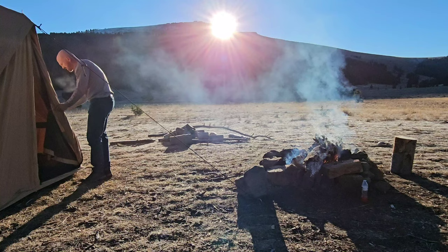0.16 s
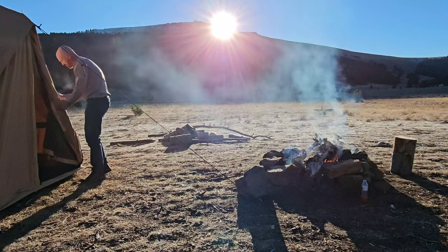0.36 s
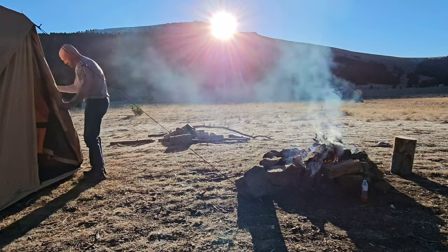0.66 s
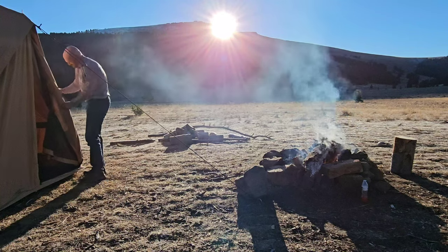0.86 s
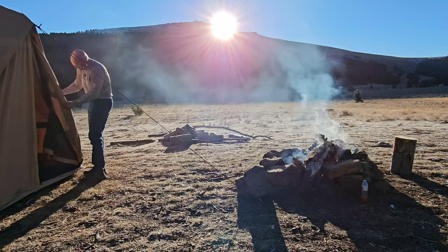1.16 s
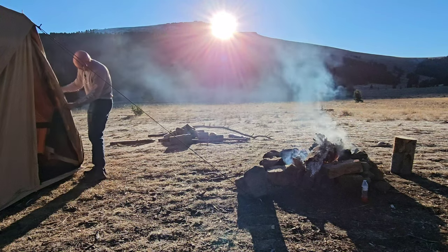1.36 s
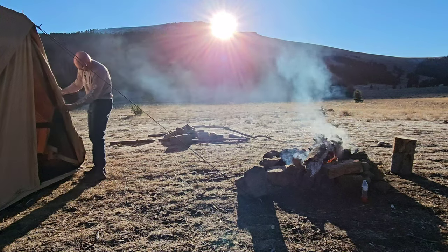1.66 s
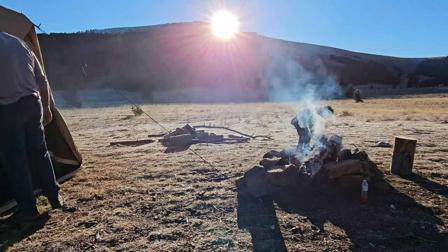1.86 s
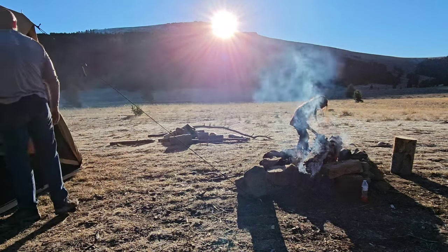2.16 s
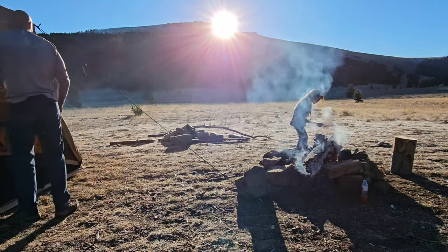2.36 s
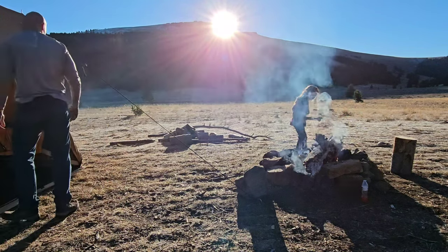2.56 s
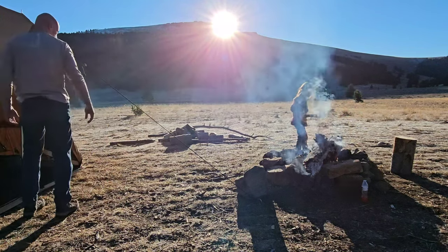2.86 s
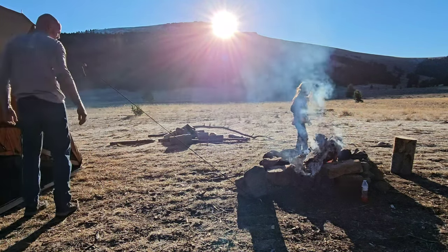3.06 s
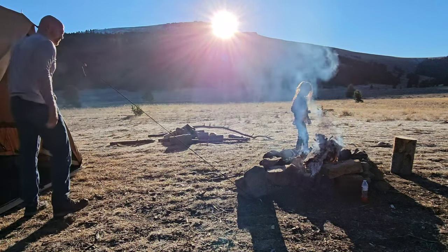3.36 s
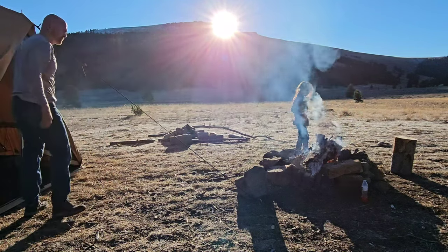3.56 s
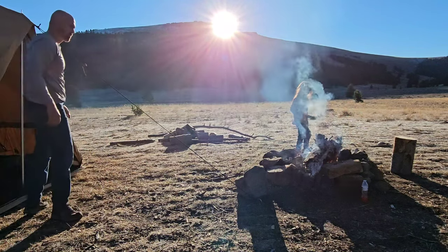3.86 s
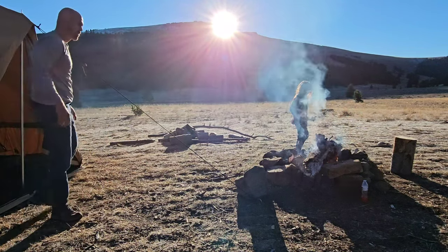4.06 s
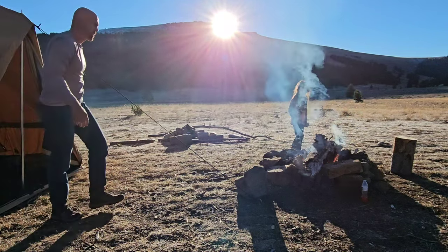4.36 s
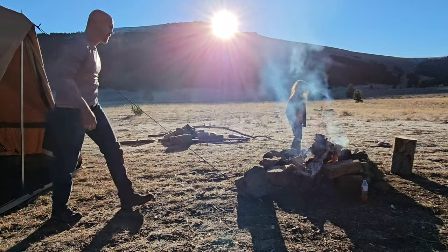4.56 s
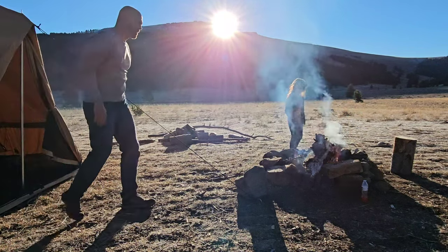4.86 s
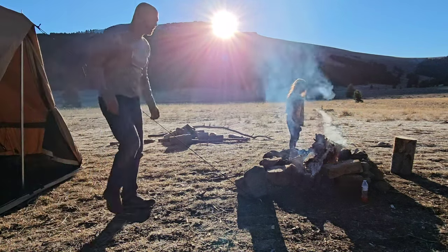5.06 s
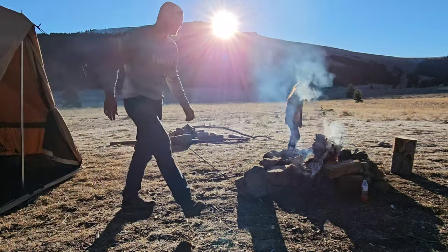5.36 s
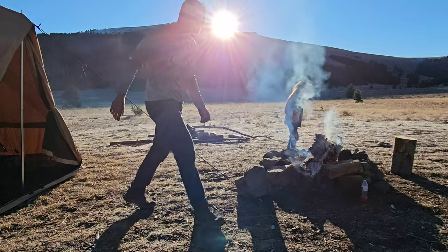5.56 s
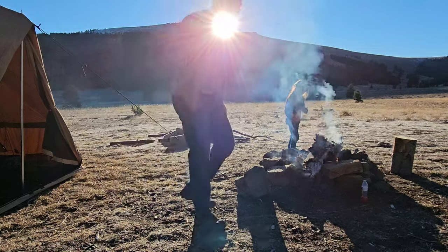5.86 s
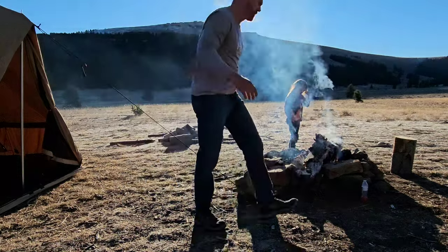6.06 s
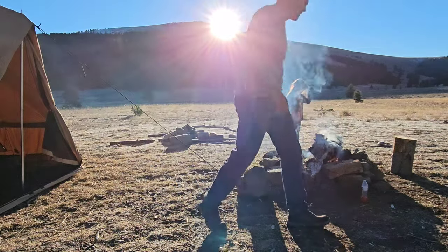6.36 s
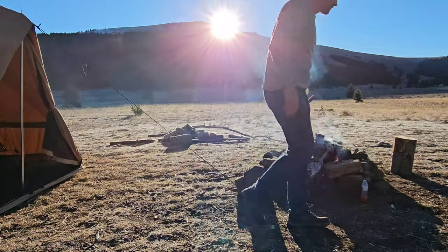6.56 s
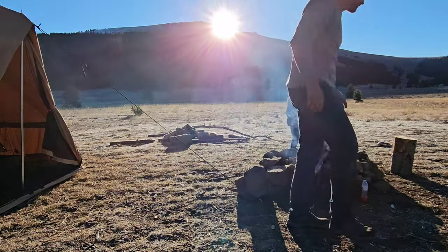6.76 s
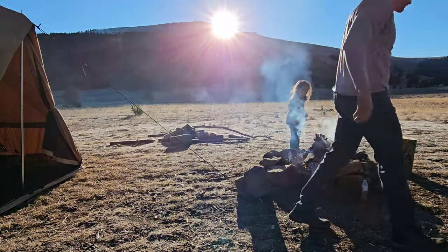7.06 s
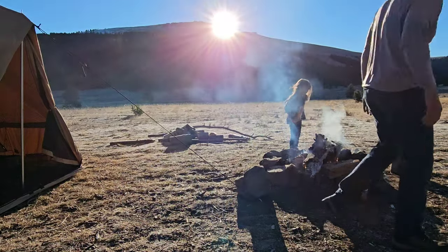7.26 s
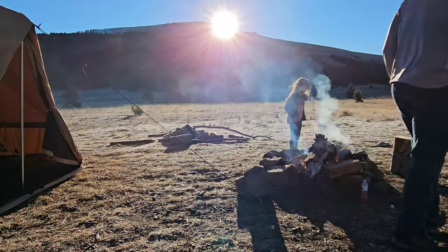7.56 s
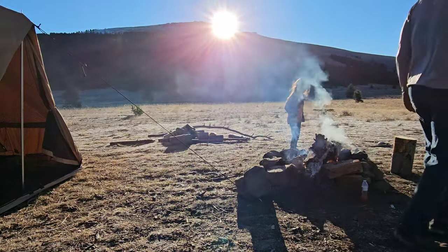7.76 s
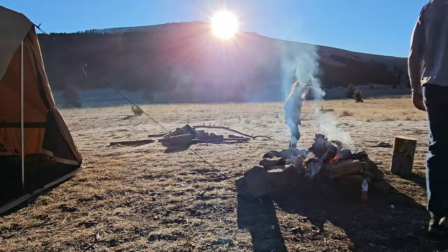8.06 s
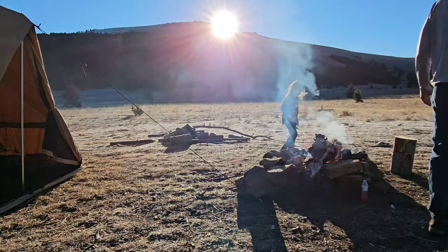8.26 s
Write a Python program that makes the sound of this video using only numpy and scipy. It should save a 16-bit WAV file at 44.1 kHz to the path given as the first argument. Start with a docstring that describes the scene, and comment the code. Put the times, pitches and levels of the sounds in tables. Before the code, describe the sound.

Outdoors, a few steps from the microphone, a fire in a stone ring crackles steadily, its bright, dry snaps standing out above gently rumbling flames. After a pair of loud cracks near the start, the flames' rush settles lower. Faint thumps of logs and boots and brief rubs of tent canvas mix in. Toward the end a log falls, the coals give a short fizz, and the popping carries on.

```python
"""A wood fire in a ring of stones on open ground, a few steps from a two-port microphone.
Flames rumble, roar and hiss, embers tick, and sap pockets pop, each pop slapping back off the stones.
Two loud cracks come near 1.5 s; the roar and hiss, louder at first, step down near 1.8 s. Logs and
boots thud and canvas scuffs here and there, and a faint whistle passes at 5.5 s. At 6.8 s a log drops
and the coals fizz; at 7.1 s comes a soft, brief crunch of hiss, like a step on dry grass."""
import sys
import numpy as np
from scipy import signal
from scipy.fft import rfft, irfft, next_fast_len
from scipy.io import wavfile
from scipy.ndimage import uniform_filter1d, map_coordinates

SR = 44100
rng = np.random.default_rng(int(sys.argv[2]) if len(sys.argv) > 2 else 0)


def int16_out(signal):
    """Quantize to a 16-bit WAV file."""
    q = np.round(np.clip(np.atleast_2d(signal).T, -1, 1) * 32767)
    wavfile.write(sys.argv[1], SR, q.astype(np.int16))


N = 371322

# Bursting sap pockets. Each row: start in seconds, level in dB, pitch in Hz, then the wooden knock
# and the hissing tail, both in dB relative to the crack.
SAP_POPS = [(0.1746, -5, 7610, -34, -29.5), (0.1844, -21.5, 5430, -20, -18),
            (0.2491, -32.5, 9240.0, -27, -22), (0.3773, -40.5, 11300, -14, -16),
            (0.4316, -40.5, 7220.0, -40.0, -12.5), (0.4791, -41.5, 7560, -40.0, -20),
            (0.6255, -26, 7870, -27, -20.5), (0.6386, -27, 7300.0, -49, -28),
            (0.7045, -46, 13100, -40, -21), (0.7319, -41.5, 2470, -2.5, -23), (0.7702, -35, 5560, -46, -17),
            (0.8616, -46, 8150, -37, -11.0), (0.9314, -33, 9630.0, -23, -10.5),
            (0.9977, -41, 8200, -40.0, -17), (1.0517, -33, 8900, -8.5, -16),
            (1.1052, -32.5, 2640, -14, -17), (1.124, -35, 7900, -40.0, -18),
            (1.1409, -38.5, 6060.0, -28, -22), (1.189, -24.5, 9640, -54, -24.0),
            (1.365, -42.5, 9300, -25.5, -18), (1.48, 1, 3155, -23.5, -29), (1.4893, -8.5, 5820, -28.5, -20),
            (1.563, 0.5, 7440, -16.5, -24), (1.5732, -20, 7000, -38.5, -20),
            (1.7953, -31.0, 13500.0, -42, -20.0), (2.029, -32, 7470, -45, -27.5),
            (2.1066, -47.5, 5260, 2, -17), (2.2032, -46, 5000, -35, -20), (2.2124, -24.5, 9450, -46.5, -26),
            (2.2522, -23.5, 1850, -13, -16), (2.3184, -33.5, 9130, -46, -23),
            (2.4014, -37.5, 7400, -19, -12), (2.4441, -34.5, 6000, -28, -26),
            (2.4849, -36.5, 7700, -48, -23), (2.5555, -36, 7700, -33, -19),
            (2.6629, -28, 2110, -7.5, -20.5), (2.7011, -28.5, 7500, -6, -14.5),
            (2.7307, -31.5, 4270, -29, -33), (2.8149, -39.5, 9500, -32, -15),
            (2.8899, -39, 3800, -17, -21.0), (2.9525, -42.5, 9770.0, -32, -20.5),
            (3.0181, -39, 7730.0, -22, -18), (3.1807, -38.5, 7900, -35, -20.5),
            (3.2576, -43.5, 7800, -28, -20), (3.3202, -31.5, 4690.0, -12.5, -23),
            (3.3321, -34.5, 8800, -33, -27), (3.3919, -35, 5970, -15, -25),
            (3.4815, -15, 1950, -8.5, -27.5), (3.5346, -31.5, 13600.0, -46, -19.5),
            (3.7168, -25, 7200, -28, -35), (3.7585, -33.5, 3860, 3, -25), (3.8629, -37, 5400, -31, -19),
            (3.9319, -30.5, 9670.0, -42, -22.5), (3.9596, -39.5, 9390.0, -15, -29),
            (3.99, -41, 5380, -32, -11.5), (4.1267, -29, 5840, -5, -15.0), (4.2096, -37.5, 7140, -9, -25.0),
            (4.438, -22, 7560, -21.5, -27), (4.4812, -30.5, 5300, -21, -20.5),
            (4.564, -26, 5600, -27, -16.5), (4.5756, -16.0, 3030, -45, -27.5), (4.617, -29, 1720, 1.5, -27),
            (4.8663, -35, 9600, -18.5, -16.5), (4.8937, -13.5, 5900, -17.5, -18),
            (4.9293, -19, 8060, -14.5, -23.0), (5.0037, -34, 11570, -16.5, -19),
            (5.0221, -35.0, 7440, -39, -22), (5.2605, -25.5, 9450.0, -7, -21),
            (5.3504, -30.5, 4940, -31, -29), (5.3681, -38.5, 8200, -20, -16), (5.4246, -43, 6000, -7, -28),
            (5.5128, -48.5, 7100, -50, -5), (5.5754, -47.5, 1700, -24, -16.5),
            (5.8096, -32.5, 7560, -44.5, -29), (5.8282, -16.0, 7600, -19.0, -28),
            (5.8823, -38, 14300, -24, -21), (5.8969, -21.5, 5600, -26.5, -26),
            (5.9343, -33.5, 7260, -38, -30), (6.0446, -44, 7850, -41, -24),
            (6.1097, -39.5, 9820.0, -36, -19), (6.2529, -25, 15020, -21.5, -24.5),
            (6.4301, -30.5, 7340, -42, -23), (6.4552, -36.5, 7350, -20.5, -16),
            (6.468, -39, 8930, -33, -12), (6.6122, -32, 1630, -7, -17.5), (6.6651, -22, 6070, -6, -13),
            (6.7512, -29, 7400.0, -44, -18), (6.7592, -33.5, 4970.0, -11.5, -11.5),
            (6.7819, -9.5, 1480, -16, -20), (6.9288, -33.5, 9800, -44, -25),
            (6.9455, -32.5, 10300.0, -17, -24), (7.035, -52, 2970, -25, -26.5),
            (7.0611, -39, 9220.0, -10, -22.0), (7.0794, -33.0, 5460, -7.0, -19.5),
            (7.2079, -29.5, 1380, -9, -16), (7.2261, -28, 10000, -7, -14.5),
            (7.3131, -21.0, 7080, -37, -24.5), (7.4912, -27, 12600, -15.5, -19.5),
            (7.6092, -15, 7350, -18, -32), (7.639, -35.0, 9100, -42, -28),
            (7.7507, -36.5, 7900, -50, -17.5), (7.8166, -35.5, 7900, -33, -19.5),
            (7.8517, -27, 7600, -26, -27.5), (8.0014, -13.5, 5170, -5, -28.5),
            (8.0395, -41, 7150, -35, -20.5), (8.0537, -15.5, 7000.0, -20.5, -25),
            (8.0845, -41, 1960, 0, -16.5), (8.162, -27.0, 6670, -23, -20), (8.189, -38, 4360, -27, -22),
            (8.308, -41.5, 7800, -49, -16.0), (8.3489, -38.5, 1460, 7.0, -14.5),
            (8.386, -43, 2400, -11, -24)]
# Slapback off the stones. Each row: delay in seconds, left level in dB, right level in dB.
STONE_ECHOES = [(.005, -23, -16.5), (.0097, -25, -23)]
# Logs and boots. Each row: start in seconds, level in dB, pitch in Hz, time to fall 60 dB in seconds,
# clatter in dB relative to the thump.
LOG_AND_BOOT_THUDS = [(1.276, -35, 194, 0.026, -11.5), (1.564, -36.5, 117, 0.11, -14),
                      (2.25, -34, 112, 0.016, -1.5), (2.263, -31.5, 128, 0.011, -14),
                      (2.658, -32.5, 213, 0.021, -4.5), (2.696, -33.5, 164, 0.014, -8),
                      (3.476, -39, 240, 0.047, -3.5), (3.848, -33.5, 186, 0.014, -13.5),
                      (4.122, -32, 214, .01, -4.5), (4.892, -32.5, 202, 0.024, -7.5),
                      (5.656, -35.5, 170, 0.028, -15), (6.661, -31, 211, 0.012, -5.5),
                      (6.781, -26, 239, 0.065, -30), (6.797, -4, 196, .011, -9.5),
                      (6.82, -29, 249, .04, -11), (6.88, -31, 186, 0.013, -6.5),
                      (7.077, -38, 103, 0.056, -4), (7.141, -33.5, 149, 0.019, -9),
                      (7.517, -27, 102, .01, -16.5), (7.716, -36, 100, 0.015, -32),
                      (8.349, -23.5, 242.5, 0.029, -11), (8.358, -22.5, 106, 0.021, -33)]
# Canvas and soles rubbing. Each row: start in seconds, peak level in dB, pitch in Hz.
CANVAS_AND_BOOT_SCUFFS = [(0.018, -44.5, 643), (0.451, -53, 1300), (0.49, -50, 680), (0.541, -44, 590),
                          (0.562, -44, 1130), (0.785, -49, 396), (2.267, -36.5, 510), (2.411, -48.5, 589),
                          (2.979, -48, 450), (4.683, -52.5, 474), (6.287, -48, 533), (6.415, -49.5, 530),
                          (7.095, -43, 446), (7.132, -59, 1490), (7.159, -44, 460), (7.514, -43.5, 1740),
                          (7.534, -46.5, 470), (7.721, -45, 450), (8.258, -50, 556)]
# The rise and fall of the blaze. Each row: time in seconds, rumble level in dB.
RUMBLE_LEVELS = [(0, -46), (.3, -46), (1.4, -46), (1.95, -51.5), (2.3, -50.5), (2.8, -45), (3.5, -48),
                 (4.4, -46.5), (4.75, -51.5), (5.4, -47), (6.1, -47.5), (6.5, -49), (6.85, -45.5),
                 (7.15, -45), (7.5, -52.5), (8.25, -47.5), (8.42, -44)]
# Coals fizzing under a dropped log, then a soft crunch like a step on dry grass.
# Each row: start in seconds, level in dB, time to fall 60 dB in seconds.
HISS_BURSTS = [(6.784, -35.5, .3), (7.13, -56.5, 0.34)]
# EQ curves for the crack and the three flame layers. Each row: frequency in Hz, gain in dB.
CRACK_EQ = [(710, -18), (1200, -17.5), (2320, -8), (3630, -5), (4940, -5), (5760, -5.5), (9640, -11),
            (10600, -12), (14900, -12), (16500, -36.5)]
RUMBLE_EQ = [(12, -49), (20, -14), (43, 1.5), (86, 4), (145, -5.5), (252, -11.5), (315, -27.5), (400, -28),
             (520, -58.5), (880, -120)]
ROAR_EQ = [(150, -27), (250, 0.5), (361, -12.5), (572, -6.5), (1090, -18), (1260, -13.5), (2500, -29),
           (3250, -45.5), (5500, -120)]
HISS_EQ = [(1180, -40), (2000, -1.5), (3740, -2), (6820, -6.5), (7390, -0.5), (9540, -6), (10900, -10.5),
           (14800, -8), (15800, -19.5), (16500, -37.5)]
# Stereo image of the flames. Each row: frequency in Hz, left-right likeness from 0 (wide) to 1 (mono).
STEREO_LIKENESS = [(60, 1), (290, 0.88), (640, 0), (1400, 0), (3000, 0)]

LOW_DB, LOW_PER_KNOCK, LOW_PER_OCTAVE_DB = -14, 0.17, 10  # woodier, deeper pops get more low end
ECHO_ABOVE_HZ = 3000  # the stones are too small to return the bass
TICK_FLOOR_DB, TICK_SPREAD_DB, TICK_CEILING_DB = -58, 4.5, -42
ROAR_DB, HISS_DB = -68.5, -72  # after the step down
LOUDER_UNTIL_S, STEP_DOWN_S, EXTRA_ROAR_DB, EXTRA_HISS_DB = 1.653, 0.167, 5.7, 8.6
SCUFF_T60_S = 0.083
WHISTLE_S, WHISTLE_HZ, WHISTLE_DB = 5.46, 856, -63  # at the top of its swell
LEFT_LAG_SAMPLES = 5  # the sound reaches the left port later
NOTCH_HZ, NOTCH_WIDTH_HZ, NOTCH_DEPTH, TOP_HZ = 10680, 730, .8, 16700


def pop(db, pitch_hz, knock_db, low_db, tail_db, length):
    """A burst of steam: a sharp crack, its slapback, a spitting tail and a knock of the wood."""
    t = np.arange(length) / SR
    since_burst = t - .0012  # the fibres tear for a millisecond first
    noise = unit(filtered(rng.standard_normal((3, length)), lambda hz: pop_colour(hz, pitch_hz, low_db)))
    snap = crack(noise, since_burst, pitch_hz)
    sound = snap + stone_echoes(snap)
    tail_fade = decay(t, 0.057) + amp(-7.5) * decay(t, 0.21)
    sound += amp(tail_db) * steam_tail(noise[1:], since_burst, pitch_hz) * tail_fade
    sound += amp(knock_db) * wood_knock(t)
    return amp(db) * sound * amp([[-.4], [.4]])  # a touch to the right


def pop_colour(hz, pitch_hz, low_db):
    """Two shelves: small pockets carry little below 3.5 kHz, deep pops little above 10 kHz."""
    low_gain = np.minimum(amp(low_db + 12), 3)  # flat at low_db = -12
    high_gain = amp(3.9 * np.log2(np.minimum(pitch_hz / 5000, 1.8)))
    low_shelf = low_gain + (1 - low_gain) / (1 + (3500 / (hz + 1)) ** 6)
    high_shelf = high_gain + (1 - high_gain) / (1 + (hz / 10000) ** 8)
    return amp(along(CRACK_EQ, hz)) * low_shelf * high_shelf


def crack(noise, since_burst, pitch_hz):
    """The fibres tear, the pocket bursts and its cavity rings for a few cycles."""
    spike = np.exp(np.where(since_burst < 0, since_burst / .00035, -since_burst / .0004))
    burst = (noise[0] + .4 * noise[1:]) * spike
    air = lambda hz: 0.54 / (1 + (10000 / (hz + 1)) ** 4)
    burst = filtered(burst, lambda hz: 1 + 2.5 * resonance(hz, pitch_hz, 0.12 * pitch_hz) + air(hz))
    cycles = np.maximum(since_burst, 0) * pitch_hz
    ring = np.sin(2 * np.pi * cycles) * np.exp(-cycles / 2.5)
    return unit_peak(unit_peak(burst) + .4 * ring)


def stone_echoes(snap):
    """The stone faces throw back the top end of a crack, a little differently each time."""
    bright = filtered(snap, lambda hz: 1j * hz / (ECHO_ABOVE_HZ + 1j * hz))
    echoes = np.zeros_like(snap)
    for delay_s, *sides_db in STONE_ECHOES:
        gains = amp(np.array(sides_db)[:, None] + rng.normal(0, 1.7))
        echoes += gains * np.roll(bright, round(delay_s * SR), axis=1)
    return echoes


def steam_tail(noise, since_burst, pitch_hz):
    """The split keeps spitting: about 110 tiny spikes a second ride on a wide hiss."""
    length = len(since_burst)
    spits = (rng.random(length) < 110 / SR) * rng.uniform(0, 3, length)
    spikes = signal.lfilter([1], [1, -np.exp(-1 / (.0007 * SR))], spits)
    steam = filtered(noise, lambda hz: 1 + resonance(hz, pitch_hz, 0.55 * pitch_hz))
    return steam * (.55 + spikes) * np.clip(since_burst / 0.00076, 0, 1)


def wood_knock(t):
    """The burst kicks the log, which answers with two dull, damped modes."""
    age = np.maximum(t - .0008, 0) / 0.00042  # in pulse widths
    grit = 0.28 * rng.standard_normal(len(t)) * decay(t, 0.037)
    push = (age > 0) * ((1 - age) * np.exp(-age) + grit)
    wood = lambda hz: resonance(hz, 580, 1900) ** 2 + 0.51 * resonance(hz, 190, 150)
    return unit_peak(filtered(push, wood))


def sap_pops():
    """The foreground crackle: sap pockets burst one by one, the loud ones with room for a longer tail."""
    track = np.zeros((2, N + SR))
    for start, db, hz, knock_db, tail_db in SAP_POPS:
        octaves_down = max(np.log2(5000 / hz), 0)
        low_db = LOW_DB + LOW_PER_KNOCK * knock_db + LOW_PER_OCTAVE_DB * octaves_down
        length = SR // 3 if db > -24 else SR // 8
        add(track, start, pop(db, hz, knock_db, low_db, tail_db, length))
    return track[:, :N]


def ember_ticks():
    """Embers fill the gaps with tiny pops, denser at first."""
    track = np.zeros((2, N + SR))
    palette = [pop(0, 4000 + 8000 * pitch, knock_db=-30 + 12 * body, low_db=-24 + 12 * body,
                   tail_db=-22, length=2048) for pitch, body in rng.random((40, 2))]
    for when, rarity, pick, early in rng.random((440, 4)):
        start = when * (LOUDER_UNTIL_S if early < .15 else N / SR)
        db = min(TICK_FLOOR_DB - TICK_SPREAD_DB * np.log(rarity), TICK_CEILING_DB)
        add(track, start, amp(db) * palette[int(pick * len(palette))])
    return track[:, :N]


def thuds():
    """Logs and boots land: a bass thump that hardly rings, with a clatter on top."""
    track, t = np.zeros((2, N + SR)), np.arange(SR // 5) / SR
    clatter_colour = lambda f: resonance(f, 403, 470) ** 2 - 0.15 * resonance(f, 1326, 370) ** 2
    for start, db, hz, t60, clatter_db in LOG_AND_BOOT_THUDS:
        thump = np.sin(2 * np.pi * hz * t) * decay(t, t60) * (1 - np.exp(-t / 0.0031)) ** 2
        grit = rng.standard_normal(len(t)) + 0.55 * rng.standard_normal((2, len(t)))
        grit *= (decay(t, 0.081) + amp(-18) * decay(t, 0.21)) * np.minimum(t / 0.00233, 1) ** 2
        clatter = filtered(grit, clatter_colour)
        add(track, start, amp(db) * (unit_peak(thump) + amp(clatter_db) * unit_peak(clatter)))
    return track[:, :N]


def scuffs():
    """Canvas and soles rub for a moment: soft noise around one pitch."""
    track, t = np.zeros((2, N + SR)), np.arange(SR // 5) / SR
    envelope = decay(t, SCUFF_T60_S) * np.minimum(t / 0.0011, 1)
    for start, db, hz in CANVAS_AND_BOOT_SCUFFS:
        friction = rng.standard_normal(len(t)) + 1.14 * rng.standard_normal((2, len(t)))
        rub = filtered(friction * envelope, lambda f: resonance(f, hz, 0.79 * hz) ** 2)
        add(track, start, amp(db) * unit_peak(rub))
    return track[:, :N]


def flames():
    """The bed: fluttering flames rumble in lumps under a roar and a hiss with two short bursts."""
    t = np.arange(N) / SR
    louder = np.clip((LOUDER_UNTIL_S - t) / STEP_DOWN_S + 1, 0, 1)
    flutter = wobble(8.7)
    lumps = amp(0.332 * flutter + 2.8 * wobble(13))
    rumble_db = np.interp(t, *np.transpose(RUMBLE_LEVELS))
    rumble = amp(rumble_db) * unit(lumps * flame_noise(RUMBLE_EQ, patchy_db=0.68))
    roar_db = ROAR_DB + EXTRA_ROAR_DB * louder + 0.37 * flutter + 2.4 * wobble(30)
    roar = amp(roar_db) * flame_noise(ROAR_EQ, patchy_db=2.0)
    bursts = sum((t > start) * amp(db) * decay(np.maximum(t - start, 0), t60)
                 for start, db, t60 in HISS_BURSTS)
    hiss_db = HISS_DB + EXTRA_HISS_DB * louder + 1.5 * wobble(3.2) + 2.0 * wobble(90)
    hiss = (amp(hiss_db) + bursts) * flame_noise(HISS_EQ, patchy_db=.4)
    return rumble + roar + hiss


def flame_noise(eq, patchy_db):
    """A rush at rms 1, mottled in time and pitch, centred in the bass and wide above."""
    cells = signal.stft(rng.standard_normal((2, N)), nperseg=512)[2]
    patches = uniform_filter1d(uniform_filter1d(rng.standard_normal(cells.shape[1:]), 8, 0), 6, 1)
    mottled = signal.istft(cells * amp(patchy_db * unit(patches)), nperseg=512)[1][:, :N]
    spread = lambda hz: np.arccos(np.clip(along(STEREO_LIKENESS, hz), -1, 1)) / 2
    mid_side_eq = lambda hz: amp(along(eq, hz)) * [np.cos(spread(hz)), np.sin(spread(hz))]
    mid, side = filtered(mottled, mid_side_eq)
    return unit(np.array([mid + side, mid - side]))


def whistle():
    """A faint, wavering tone that swells and fades, perhaps steam leaving a crack."""
    under_db = 10 * ((np.arange(N) / SR - WHISTLE_S) / .11) ** 2  # 10 dB down 0.11 s either side
    hz = WHISTLE_HZ - 1.1 * np.minimum(under_db, 20) + 4 * wobble(25)  # quieter is flatter
    db = WHISTLE_DB - under_db + 1.5 * wobble(30)
    phase = 2 * np.pi * np.cumsum(hz) / SR
    octave = amp(2 * db + 48.5) * np.sin(2 * phase)  # grows with the square of the strength
    return np.sqrt(2) * (amp(db) * np.sin(phase) + octave)


def amp(db):
    """Gain of a level in dB."""
    return 10 ** (np.asarray(db) / 20)


def decay(t, t60):
    """A fade that falls 60 dB every t60 seconds."""
    return amp(-60 * t / t60)


def unit(x):
    """x at rms 1."""
    return x / np.sqrt(np.mean(x ** 2) + 1e-20)


def unit_peak(x):
    """x at peak 1."""
    return x / abs(x).max()


def along(points, hz):
    """Reads a curve of (Hz, value) points on a log frequency axis."""
    f, v = np.transpose(points)
    return np.interp(np.log(hz + 1), np.log(f + 1), v)


def wobble(rate):
    """A smooth random curve, rate knots a second."""
    return map_coordinates(rng.standard_normal(int(N * rate / SR) + 4), [np.arange(N) * rate / SR])


def filtered(x, response):
    """x through a filter given as a complex response of frequency."""
    n = x.shape[-1]
    padded = next_fast_len(n + 1024)
    return irfft(rfft(x, padded) * response(np.fft.rfftfreq(padded, 1 / SR)), padded)[..., :n]


def resonance(hz, centre_hz, width_hz):
    """Response of one damped mode, 1 at its centre."""
    return 1j * hz * width_hz / (centre_hz ** 2 - hz ** 2 + 1j * hz * width_hz)


def add(track, start_s, sound):
    """Mixes in a stereo sound, the left side a little late."""
    at = round(start_s * SR)
    track[0, at + LEFT_LAG_SAMPLES:][:sound.shape[1]] += sound[0]
    track[1, at:][:sound.shape[1]] += sound[1]


def scene():
    """The fire and the camper moving about."""
    return sap_pops() + ember_ticks() + thuds() + scuffs() + flames() + whistle()


def record(dry):
    """The microphone housing notches the treble, peaks clip at full scale and the very top is cut."""
    housed = filtered(dry, lambda hz: 1 - NOTCH_DEPTH * resonance(hz, NOTCH_HZ, NOTCH_WIDTH_HZ))
    band_limited = filtered(np.clip(housed, -1, 1), lambda hz: hz < TOP_HZ)
    return np.clip(band_limited, -1, 1)


dry = scene()
out = record(dry)
int16_out(out)
```